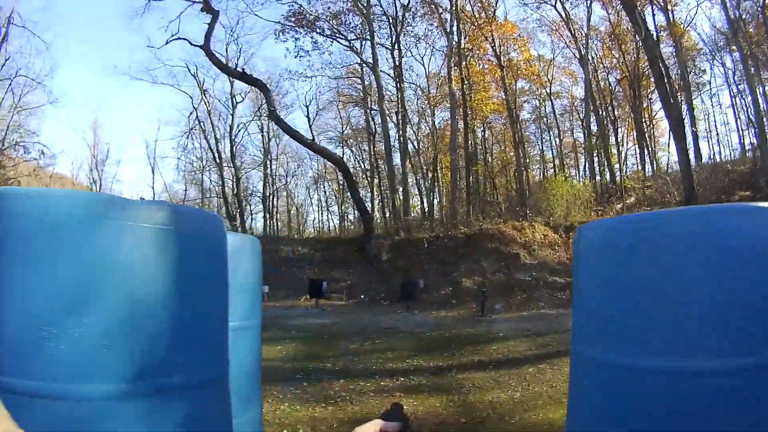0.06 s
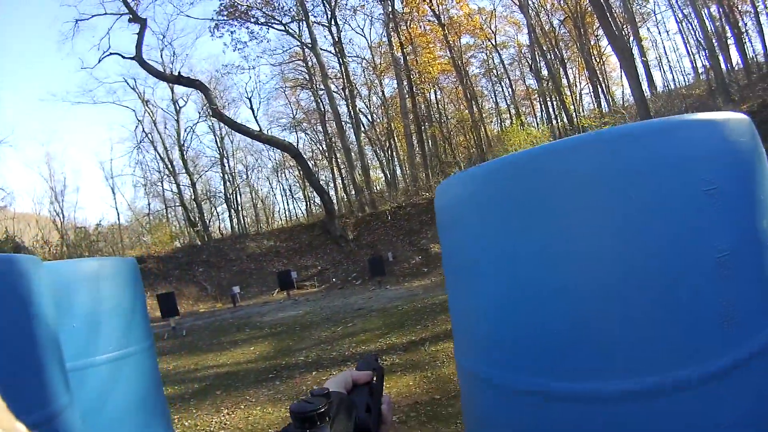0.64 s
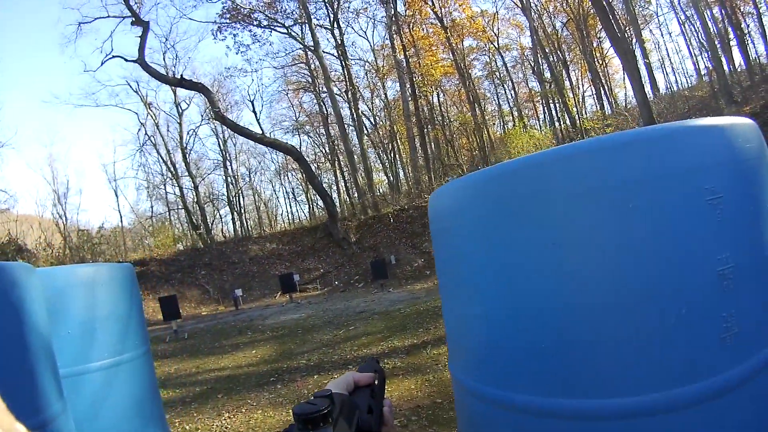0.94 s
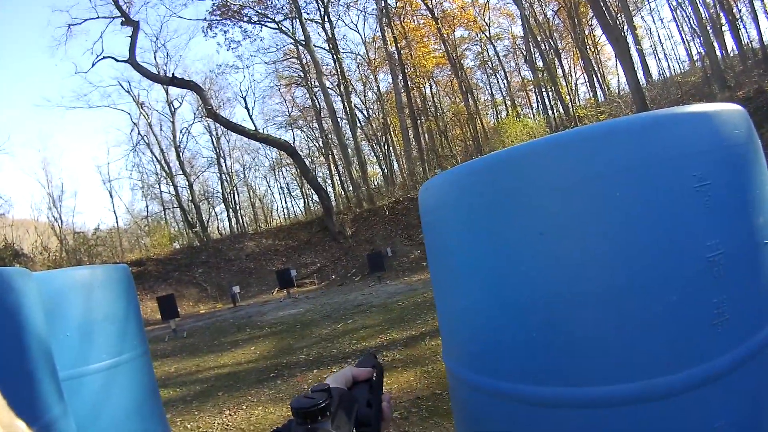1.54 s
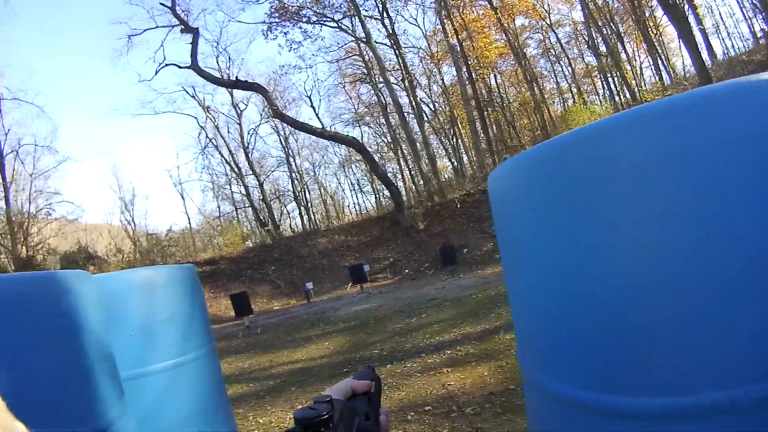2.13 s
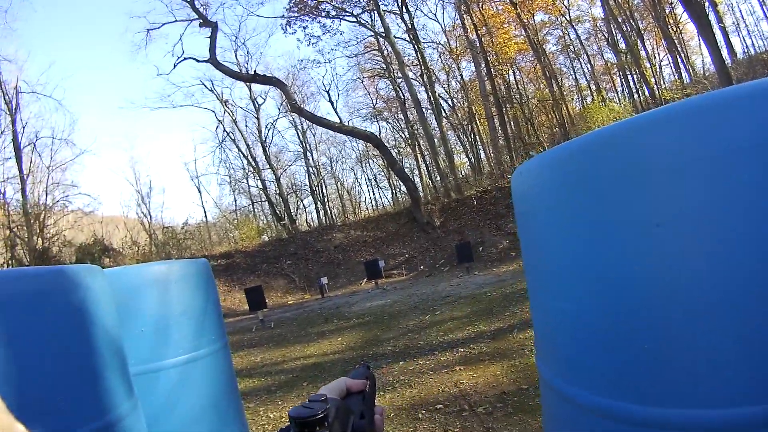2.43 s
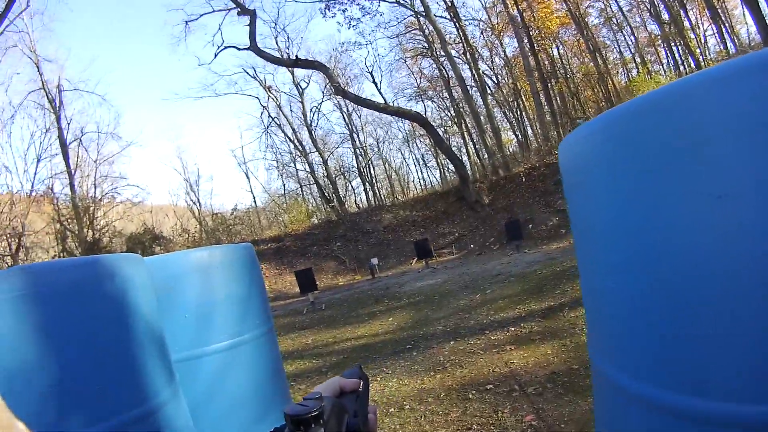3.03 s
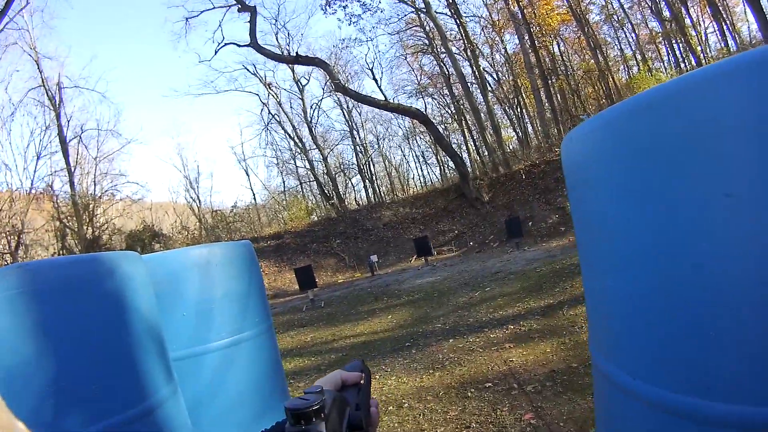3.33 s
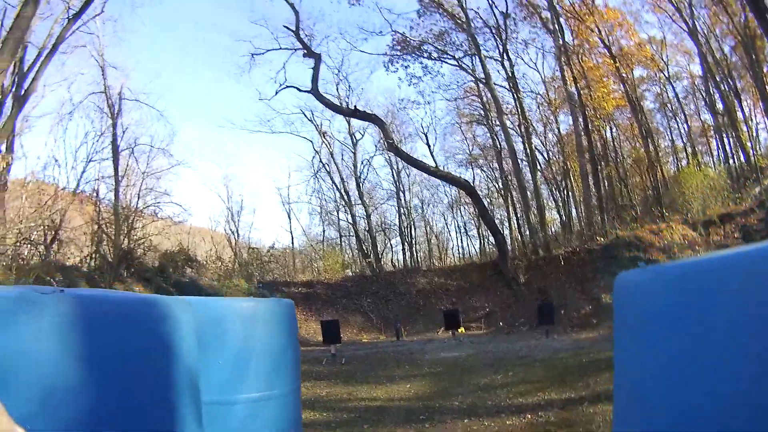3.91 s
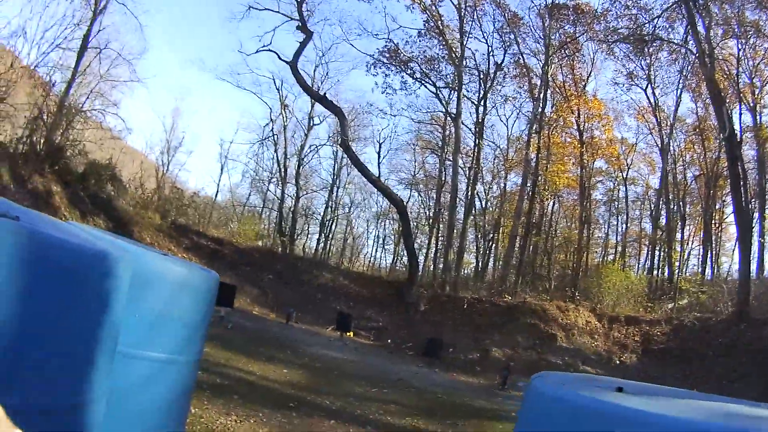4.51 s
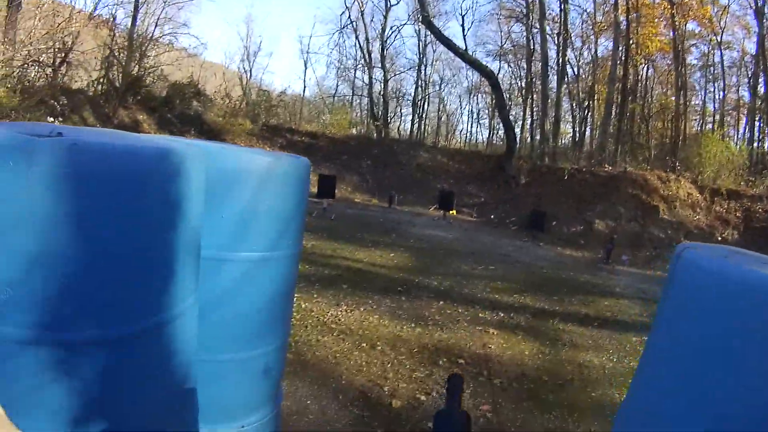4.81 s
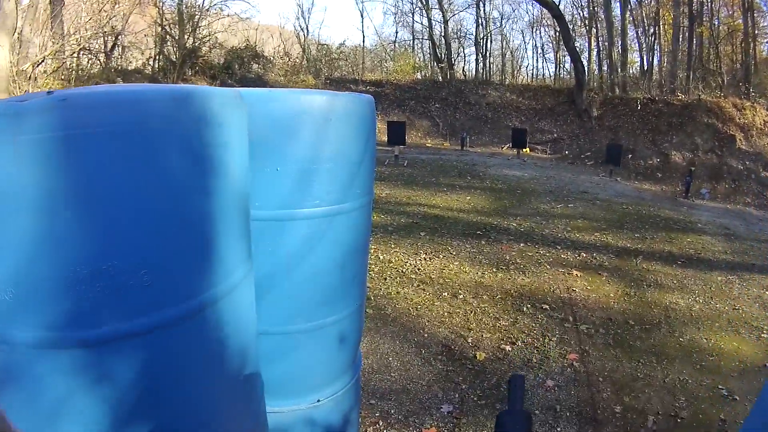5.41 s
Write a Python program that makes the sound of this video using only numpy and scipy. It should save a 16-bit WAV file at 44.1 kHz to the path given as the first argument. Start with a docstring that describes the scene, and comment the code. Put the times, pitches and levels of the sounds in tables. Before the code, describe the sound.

Four loud, close carbine shots echo across an outdoor range, the last three ringing steel plates, with two distant shots and clicking gear.

```python
"""On an outdoor range, gear rubs, rattles, knocks and clicks as a carbine is readied.
A shot comes from another bay. Just after it the carbine fires four times, each blast overloading
a head-worn microphone, and an earth bank and the forest behind it answer every shot.
Two sharp cracks follow its first shot; the last three bullets each ring a hanging steel plate.
One more shot comes from the other bay, then the gear clicks and rubs as the gun is lowered."""
import sys
import numpy as np
from scipy import signal
from scipy.fft import rfft, irfft, next_fast_len
from scipy.io import wavfile

SR = 44100
rng = np.random.default_rng(int(sys.argv[2]) if len(sys.argv) > 2 else 0)


def transcribe(u):
    """Save the signal u as a 16-bit wav file named by the first command-line argument.

    u: samples, shape (n,) or (channels, n), limited to [-1, 1]; the rate is SR.
    q: integer samples, one column per channel.
    """
    v = np.clip(np.atleast_2d(u).T, -1, 1)
    q = np.round(v * 32767).astype(np.int16)
    wavfile.write(sys.argv[1], SR, q)


N = 244916
T = np.arange(2 * SR) / SR  # seconds since a sound began

# Gear rubs as the gun is raised and lowered. Each row: start in seconds, length in seconds, level in dB.
RUB_STROKES = [(-0.01, 0.06, -38.5), (0.262, 0.072, -28.5), (0.349, .39, -47), (5.292, .1, -44),
               (5.379, 0.17, -54.5)]
# The tone colour of a dull jolt. Each row: frequency in Hz, level in dB.
BUMP_SPECTRUM = [(30, -5.5), (70, -2.5), (110, -2.5), (200, -7), (600, -27), (2000, -53)]
# The tone colour of a close blast or a bullet's splash. Each row: frequency in Hz, level in dB.
BLAST_SPECTRUM = [(40, -0.5), (120, -1.5), (500, -2), (1200, 0.5), (2500, 2.5), (4500, 2.5), (8000, -7.5),
                  (15000, -22.5)]


def amp(db):
    """Turn decibels into a number to multiply a sound by."""
    return 10 ** (np.asarray(db) / 20)


def along(points, hz):
    """Read between rows of frequency and value, with the octaves evenly spaced."""
    freqs, values = np.transpose(points)
    return np.interp(np.log(hz + 1), np.log(freqs + 1), values)


def noise(spectrum, size=len(T)):
    """Fresh noise with the given tone colour and a typical size of 1."""
    gains = amp(along(spectrum, np.fft.rfftfreq(size, 1 / SR)))
    coloured = irfft(rfft(rng.standard_normal(size)) * gains, size)
    return coloured / coloured.std()


def fade(t60, attack):
    """A quick rise, then a decay. The fade time t60 is the seconds it takes to drop 60 dB."""
    return np.exp(-np.log(1000) * T / t60) * (1 - np.exp(-T / attack))


def wobble(rate, x=T):
    """A random curve that heads for a new value rate times a second (or per unit of x)."""
    values = rng.standard_normal(int(x[-1] * rate) + 2)
    return np.interp(x * rate, np.arange(len(values)), values)


def add(track, start, sound):
    """Mix a sound into the track at a start time in seconds."""
    part = track[max(round(start * SR), 0):][:len(sound)]
    part += sound[:len(part)]


def air():
    """The faint, steady air of the woods."""
    # Its tone colour. Each row: frequency in Hz, level in dB.
    air_spectrum = [(30, -5), (120, -8), (300, -7.5), (700, -10.5), (1600, -4), (5000, -10.5),
                    (10000, -24.5), (15000, -31.5)]
    return amp(-58) * noise(air_spectrum, size=N)


def rubs():
    """Gear slides in tiny catches and shakes the microphone into a low rumble."""
    # The tone colour of the sliding. Each row: frequency in Hz, level in dB.
    rub_spectrum = [(35, -52), (60, -27), (591, -9.5), (855, -14), (1150, -2.5), (1450, -5), (2060, -8.5),
                    (9450, -21), (15000, -43)]
    out = np.zeros(N)
    for start, length, db in RUB_STROKES:
        stroke = np.sqrt(np.abs(np.sin(np.pi * np.minimum(T / length, 1))))
        catches = amp(3.2 * wobble(770) + wobble(60))
        scrape = catches * noise(rub_spectrum)
        rumble = amp(-22) * noise(BUMP_SPECTRUM)
        add(out, start, amp(db) * stroke * (scrape + rumble))
    return out


def snap_colour(hz):
    """The tone colour of a small hard contact: a broad hump around hz, steep below, dull at the top."""
    treble_db = -20 * np.log10(11500 / hz)
    return [(hz / 6, -38), (hz / 1.6, -5), (hz, 0), (11500, treble_db), (14500, treble_db - 18)]


def rattle(ticks_per_second=32):
    """Loose hardware gives tiny bright ticks at random moments in each rub."""
    loudness = np.zeros(N)
    hiss = noise(snap_colour(hz=6430), size=N)
    tick_shape = fade(0.0088, 0.00025)
    for start, length, _ in RUB_STROKES:
        for place, strength in rng.random((round(ticks_per_second * length), 2)):
            add(loudness, start + place * length, amp(-52 + 8.7 * strength) * tick_shape)
    return loudness * hiss


def snap(hz, t60):
    """A short crack and its faint scatter, as when two hard parts meet."""
    return noise(snap_colour(hz)) * (fade(t60, 0.00021) + amp(-21.5) * fade(8 * t60, 0.0054))


def clack():
    """The hollow stock and magazine answer a contact, and a faint ring lingers in the gun."""
    # The ring inside the gun. Each row: frequency in Hz, level in dB, fade time in seconds.
    spring_tones = [(1030, -9, 1), (1040, -4.5, 0.68), (1674, -0.5, .6), (1857, -8.5, .58)]
    # The tone colour of the hollow parts. Each row: frequency in Hz, level in dB.
    hollow_spectrum = [(150, -36), (450, -15), (620, -9.5), (790, -1), (1000, -3), (1280, -6.5), (1500, -7),
                       (1800, -6.5), (2300, -8), (6000, -39.5)]
    ring = sum(amp(db) * fade(t60, 0.002) * np.sin(2 * np.pi * (hz * T + rng.random()))
               for hz, db, t60 in spring_tones)
    hollow = noise(hollow_spectrum) * (fade(0.026, 0.0029) + amp(-25) * fade(0.33, 0.0037))
    return hollow + amp(-33.5) * ring


def bump():
    """A dull jolt reaches the microphone through the shooter's body."""
    return noise(BUMP_SPECTRUM) * fade(0.062, 0.0081)


def knocks(base_hz=413, t60=0.026):
    """The stock thuds against the shooter, shakes the hard parts and settles with a bump."""
    # The knocks. Each row: start in seconds, level in dB, pitch multiplier (soft contacts are lower).
    contacts = [(0.0616, -11, 0.95), (0.1737, -13.5, 0.954), (0.446, -45.5, 0.67), (0.685, -40.5, 0.92),
                (1.0634, -39, 0.61)]
    # The stock's many other tones. Each row: frequency in Hz before the multiplier, level in dB.
    stock_spectrum = [(40, -19.5), (130, -22.5), (250, -3.5), (410, -0.5), (560, -8), (1200, -27.5),
                      (5000, -55.5)]
    out = np.zeros(N)
    for start, db, pitch in contacts:
        tone = np.sin(2 * np.pi * base_hz * pitch * T) * fade(t60, 0.0012)
        body = noise([(hz * pitch, level) for hz, level in stock_spectrum])
        body *= fade(t60, 0.0016) + amp(-18) * fade(0.17, 0.0045)
        shaken_parts = amp(-16.5) * snap(hz=2297, t60=t60) + amp(-1.5) * clack()
        add(out, start, amp(db) * (tone + amp(-3.5) * body + shaken_parts))
        add(out, start + 0.01, amp(db - 17) * bump())
    return out


def clicks_and_cracks():
    """Gun and gear parts click. Two sharp cracks follow the first carbine shot,
    perhaps its bullet hitting the bank, or echoes."""
    # Each row: start in seconds, level in dB, centre frequency in Hz, fade time in seconds.
    sharp_sounds = [(0.3716, -36, 6700, 0.01), (0.4354, -27, 5460, 0.013), (0.4722, -9, 6300, 0.024),
                    (0.5206, -24, 2950, 0.047), (1.264, -5.5, 2270, 0.017), (1.3154, -11.5, 2270, .012),
                    (5.1342, -28, 2480, 0.028), (5.153, -30.5, 3070, 0.044), (5.2148, -41, 7480, 0.019),
                    (5.3135, -28, 2220, 0.027)]
    out = np.zeros(N)
    for start, db, hz, t60 in sharp_sounds:
        clack_db = 7.5 + 1.74 * db  # louder ones carry much more hollow clack
        add(out, start, amp(db) * snap(hz, t60) + amp(clack_db) * clack())
    return out


def pings(ring_hz=11800):
    """A small, light metal part ticks and rings the same high tone each time."""
    # The ticks. Each row: start in seconds, level in dB.
    ticks = [(0.526, -33), (0.7122, -31), (3.3912, -29.5), (4.591, -39), (4.631, -38)]
    out = np.zeros(N)
    tone = amp(-10.5) * fade(0.15, 0.00065) * np.sin(2 * np.pi * ring_hz * T)
    for start, db in ticks:
        add(out, start, amp(db) * (snap(hz=4500, t60=0.012) + tone))
    return out


def other_bay(echo_delay=0.064):
    """Distant shots: a short crack, a blurred echo off the earth bank and a long wash from the trees."""
    # The shots. Each row: start in seconds, then the levels of blast, bank echo and forest in dB.
    shots = [(1.1076, -12.5, -13.5, -16.5), (4.0884, -11, -6.5, -15.5)]
    # The tone colours of the far blast and of its forest echo. Each row: frequency in Hz, level in dB.
    crack_spectrum = [(50, -32), (200, -29.5), (500, 7.5), (1100, -0.5), (2800, 2), (5500, -8),
                      (10000, -32), (15000, -37.5)]
    forest_spectrum = [(50, -34), (150, -26), (400, -8), (900, 0), (2300, -4.5), (4500, -6), (8000, -17.5),
                       (15000, -39.5)]
    out = np.zeros(N)
    for start, db, bank_db, forest_db in shots:
        crack = noise(crack_spectrum) * (fade(0.041, 0.0001) + amp(-3.5) * fade(0.12, 0.0002))
        add(out, start, amp(db) * crack)
        add(out, start + echo_delay, amp(bank_db) * noise(crack_spectrum) * fade(0.074, 0.0044))
        add(out, start, amp(forest_db) * forest(forest_spectrum, stretch=1.06, build=0.025))
    return out


def forest(spectrum, stretch, build):
    """Sound scattered by the trees builds up, then dies away, lasting longest in the middle pitches."""
    # How long the trees echo. Each row: frequency in Hz, fade time in seconds before stretching.
    fade_times = [(80, 0.1), (300, 1.55), (900, 1.568), (2200, 1.257), (4500, 0.74), (8000, 0.57),
                  (15000, 0.3)]
    hz, seconds, bands = signal.stft(noise(spectrum), SR, nperseg=256)
    t60 = stretch * along(fade_times, hz)[:, None]
    bands *= np.exp(-np.log(1000) * seconds / t60)
    wash = signal.istft(bands, SR, nperseg=256)[1][:len(T)]
    return wash * (1 - np.exp(-T / build))


def carbine(echo_delay=0.058, recoil_gap=0.064, recoil_loss_db=8):
    """The hammer falls, the muzzle blasts, bank and forest answer, and the gun rocks on the shoulder."""
    # The shots. Each row: start in seconds, then the levels of blast, pressure surge, bank echo,
    # forest and recoil bump in dB.
    shots = [(1.170, 15, 12.5, 5.5, -9.5, -2.5), (1.794, 13, 14.5, -0.5, -9.5, -26),
             (2.6152, 21.5, 26.5, 2, -9, -27), (3.4775, 17, 11, 3.5, -9.5, -18.5)]
    # The tone colour of the forest's answer. Each row: frequency in Hz, level in dB.
    forest_spectrum = [(40, -17.5), (120, -9.5), (300, -14.5), (900, 3), (2200, 7.5), (4500, 9),
                       (8000, -3.5), (15000, -28)]
    hammer_spectrum = [(200, -25.5), (1200, -7), (2300, 1), (5000, -4.5), (15000, -24.5)]
    out = np.zeros(N)
    for start, db, surge_db, bank_db, forest_db, recoil_db in shots:
        hammer = noise(hammer_spectrum) * fade(0.008, 0.00017)
        add(out, start - 0.005, amp(-11) * hammer)
        scatter = amp(-20) * fade(0.23, 0.054)  # off nearby barrels and the ground
        blast = noise(BLAST_SPECTRUM) * (fade(0.1, 0.00027) + scatter)
        add(out, start, amp(db) * blast + amp(surge_db) * surge(period=0.061, rise=0.007))
        add(out, start + echo_delay, amp(bank_db) * noise(BLAST_SPECTRUM) * fade(0.087, 0.00069))
        add(out, start, amp(forest_db) * forest(forest_spectrum, stretch=0.89, build=0.018))
        for k in range(3):
            add(out, start + (k + 1) * recoil_gap, amp(recoil_db - k * recoil_loss_db) * bump())
    return out


def surge(period, rise):
    """The muzzle gas swings the air pressure slowly: strongly one way, then weakly the other."""
    return -(T / rise) ** 2 * np.exp(-T / rise) * np.sin(2 * np.pi * T / period)


def plates():
    """Lead splashes on steel; each plate rings freely until its hanger catches it and damps the ring."""
    # One hit a plate. Each row: start in seconds, level in dB, swings a second, seconds to the first
    # swell, swing depth in dB, seconds of free ringing, shimmer level in dB.
    hits = [(1.87, 0.5, 9.8, 0.026, 3.5, .27, -30.5), (2.698, .5, 5.8, 0.048, 5, .38, -25.5),
            (3.564, 0.5, 5.4, 0.048, 3, .39, -25.5)]
    # The tones of each plate. Each row: frequency in Hz, level in dB, free fade time in seconds.
    first_tones = [(2032, -15, 0.87), (2240, -16, 0.64), (3203, -23, 0.65), (3777, -10, 0.65),
                   (4067, -26, 0.98), (5367, -26, 0.5), (5712, -24, 0.8), (6058, -26, 0.58),
                   (6303, -30, 0.75), (7816, -27, 0.62), (7912, -27, 0.61), (9132, -39, 0.77),
                   (11500, -38, 0.4), (13530, -34, 0.32)]
    second_tones = [(2032, -12.5, 1.35), (2252, -19, 1.16), (3329, -28, 1.44), (3694, -14, 0.65),
                    (3762, -14, 1.08), (4122, -9, 0.45), (4418, -14, 0.95), (5427, -25, 0.59),
                    (6010, -16, 0.46), (6729, -32, 1.23), (7072, -25, 0.64), (7457, -31, 0.88),
                    (8084, -23, 1.25), (8232, -24, 1.15), (10659, -39, 1.58), (11066, -38, 1.26),
                    (11864, -36, 0.9), (12794, -35, 0.62), (14230, -41, 0.69)]
    third_tones = [(2017, -22, 1.57), (2213, -22, 0.88), (3646, -17, 1.18), (3728, -16, 1.09),
                   (3974, -13, 0.52), (4326, -13, 0.68), (5669, -22, 0.58), (5917, -20, 0.53),
                   (6687, -23, 0.57), (6932, -18, 0.49), (7341, -20, 0.74), (8038, -20, 0.74),
                   (8156, -20, 0.73), (9805, -34, 0.63), (10610, -34, 0.77), (11490, -35, 0.73),
                   (11770, -36, 0.76), (14166, -47, 0.94)]
    out = np.zeros(N)
    for hit, tones in zip(hits, (first_tones, second_tones, third_tones)):
        start, db, swing_rate, first_swell, swing_db, free_time, shimmer_db = hit
        caught = np.clip((T - free_time) / 0.07, 0, 1)
        swing = 2 * np.pi * swing_rate * (T - first_swell)
        ring = plate_ring(tones, swing, swing_db, caught)
        facing_db = swing_db * np.cos(swing)
        ring += amp(shimmer_db + facing_db - 9 * caught) * shimmer() * fade(0.73, 0.0005)
        first_flex = 1 + fade(0.24, 0.00088)  # the first wide flexing dies quickly
        splash = amp(-3.5) * noise(BLAST_SPECTRUM) * fade(0.11, 0.0003)
        add(out, start, amp(db) * (ring * first_flex + splash))
    return out


def plate_ring(tones, swing, swing_db, caught, sway_metres=0.01, flutter_rate=50):
    """Swinging turns a plate's face to and fro and bends its pitch; its forest echo makes it flutter."""
    ring = np.zeros(len(T))
    delay = sway_metres * np.sin(swing) / 343  # sound travels 343 metres a second
    echo = 0.64 * (1 - np.exp(-T / 0.068))
    for hz, db, t60 in tones:
        start_phase, lag = rng.uniform(0, 2 * np.pi), rng.normal(0, 0.4)
        loss_db = 60 * T / t60 + 6 * caught * (1 + hz / 7000)  # the hanger damps high tones most
        gain = amp(db + swing_db * np.cos(swing + lag) - loss_db)
        phase = 2 * np.pi * hz * (T + delay) + start_phase + 0.52 * wobble(56)
        scattered = wobble(flutter_rate) * np.sin(phase) + wobble(flutter_rate) * np.cos(phase)
        ring += gain * (np.sin(phase) + echo * scattered)
    return ring


def shimmer():
    """A plate's dozens of weak, close tones, made by gathering noise into narrow random peaks."""
    # Their overall tone colour. Each row: frequency in Hz, level in dB.
    shimmer_spectrum = [(500, -17), (1500, -6), (3000, 1), (6000, 4), (8500, -1), (12000, -12),
                        (15000, -14.5)]
    hz = np.fft.rfftfreq(len(T), 1 / SR)
    peaks = amp(np.minimum(18 * wobble(1 / 40, hz), 30))
    tones = irfft(rfft(noise(shimmer_spectrum)) * peaks, len(T))
    return tones / tones.std()


def scene():
    """All the sounds over the air of the woods, added into one channel."""
    mix = air() + carbine() + other_bay() + plates()
    mix += knocks() + clicks_and_cracks() + pings() + rubs() + rattle()
    return mix[None]


def record(dry):
    """Blasts push the microphone to its limit; then the bass, the peaks and the top treble are cut."""
    mic_limit, bass_hz, top_hz = 1.06, 72, 15600
    squashed = dry / (1 + np.abs(dry / mic_limit) ** 6) ** (1 / 6)
    bass_cut = signal.butter(3, bass_hz, "high", fs=SR, output="sos")
    clipped = np.clip(signal.sosfilt(bass_cut, squashed), -1, 1)
    size = next_fast_len(N + SR // 2)
    treble_cut = 1 / (1 + (np.fft.rfftfreq(size, 1 / SR) / top_hz) ** 120)
    return irfft(rfft(clipped, size) * treble_cut, size)[:, :N]


dry = scene()
out = record(dry)
transcribe(out)
```